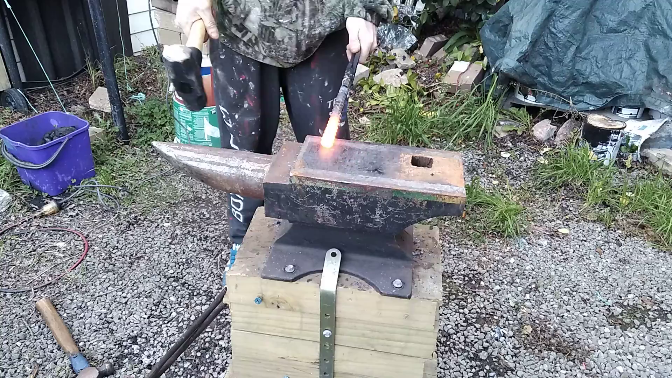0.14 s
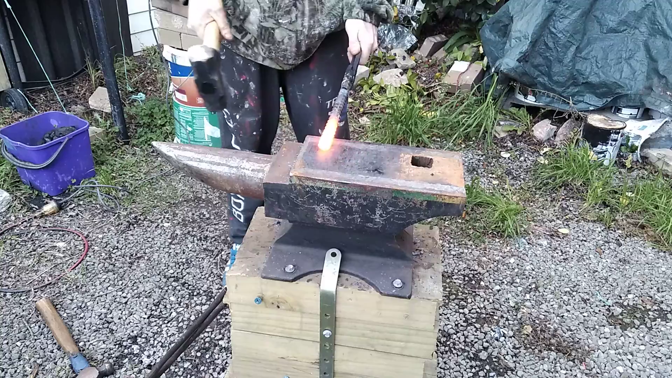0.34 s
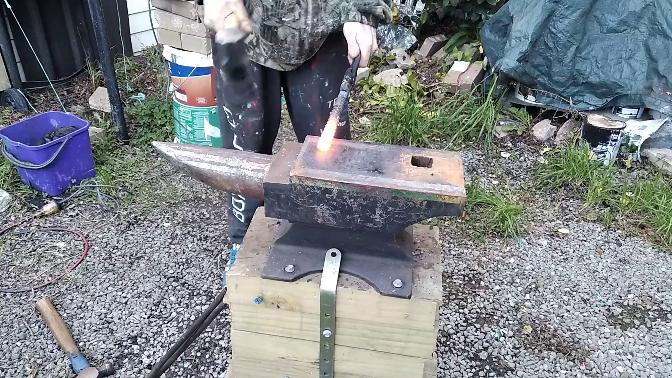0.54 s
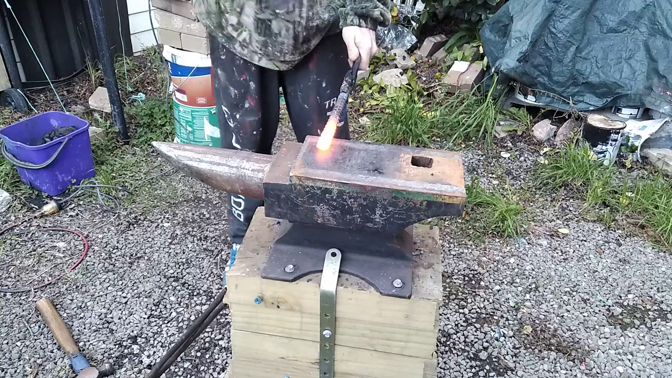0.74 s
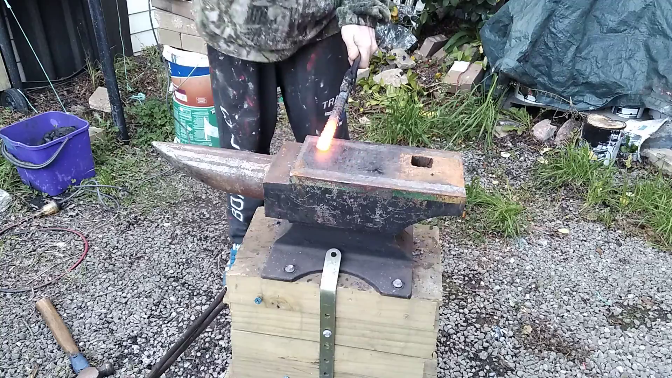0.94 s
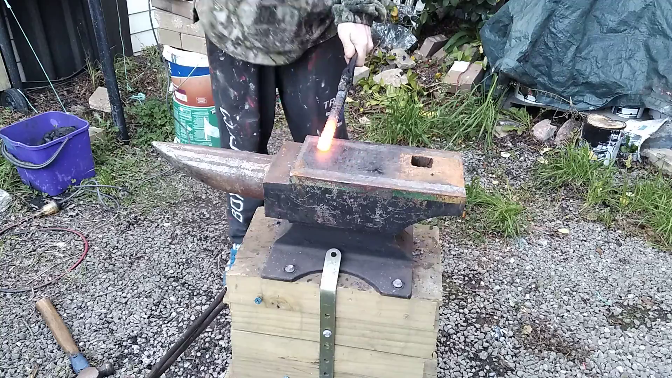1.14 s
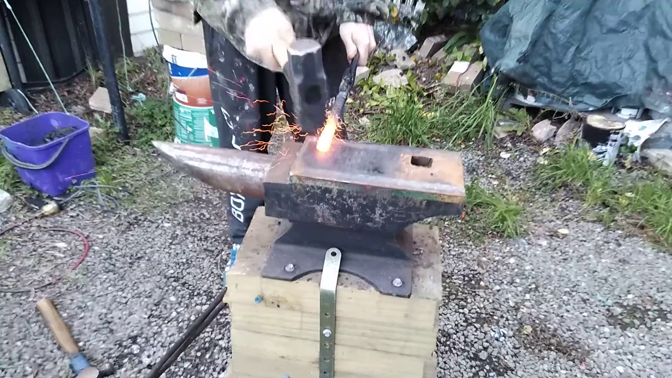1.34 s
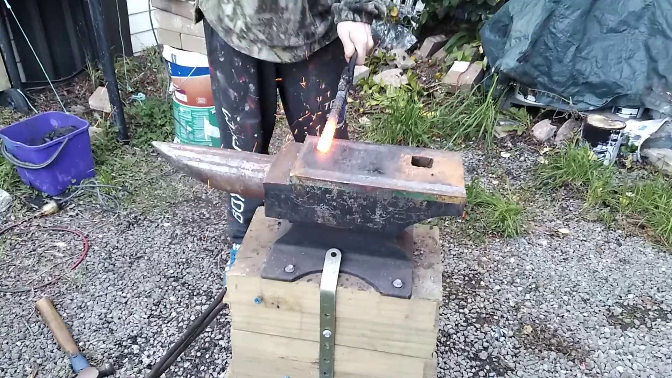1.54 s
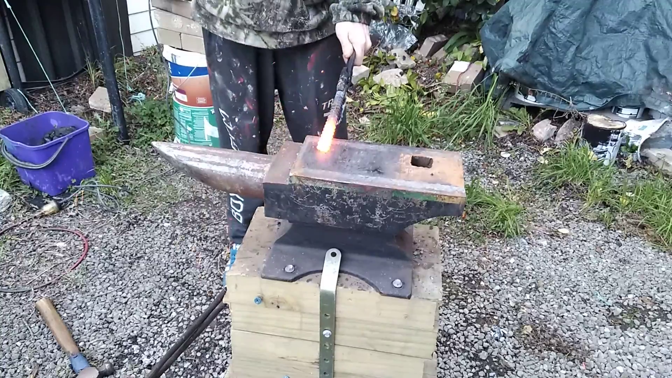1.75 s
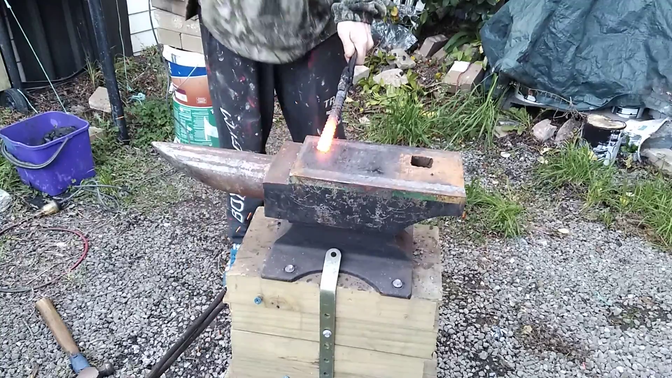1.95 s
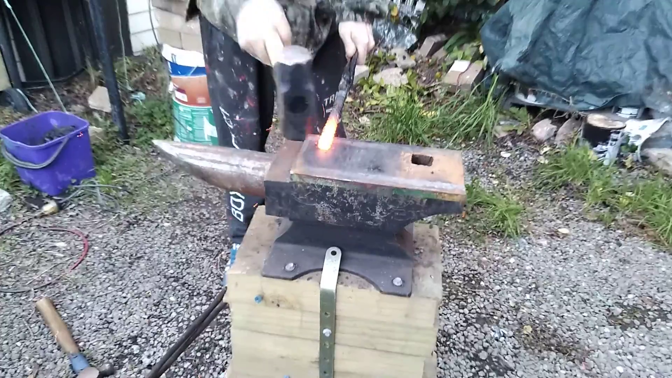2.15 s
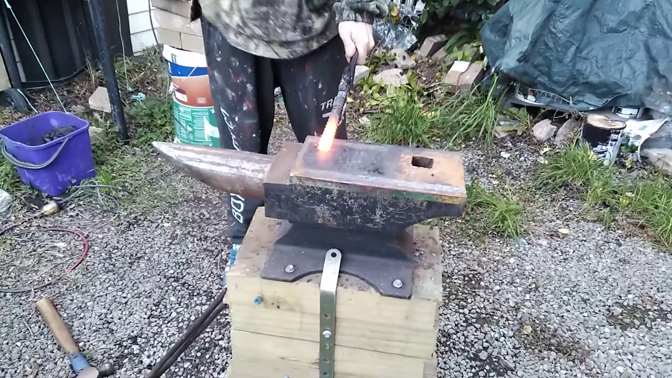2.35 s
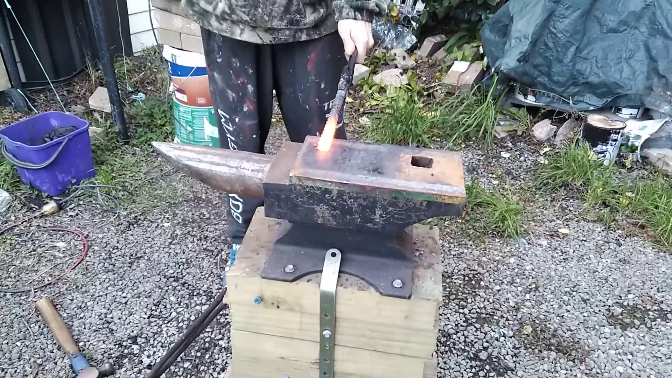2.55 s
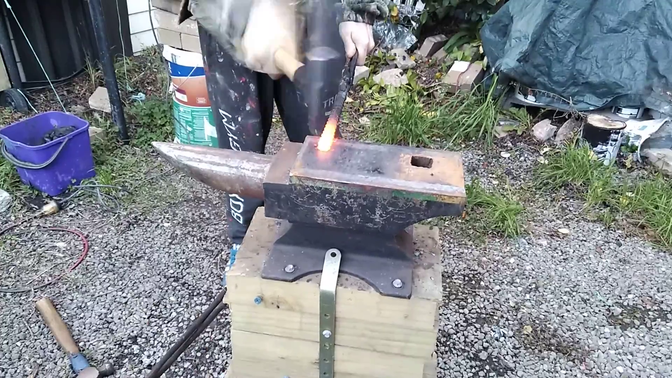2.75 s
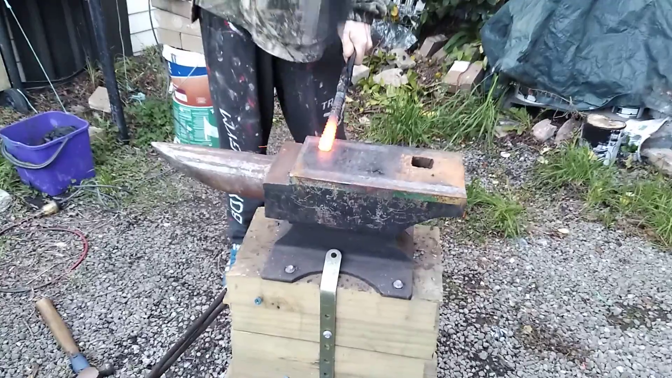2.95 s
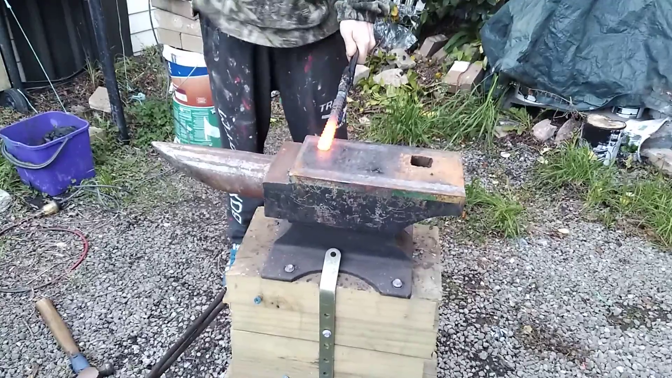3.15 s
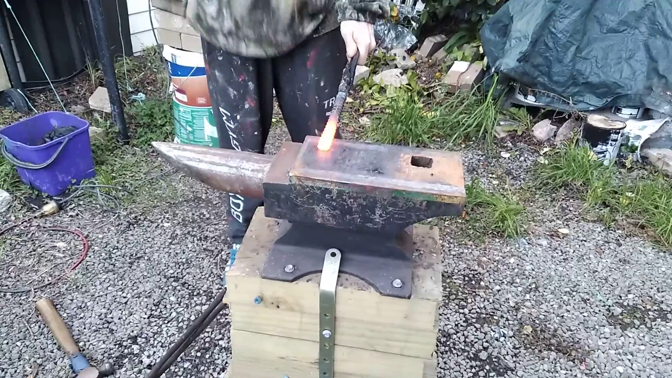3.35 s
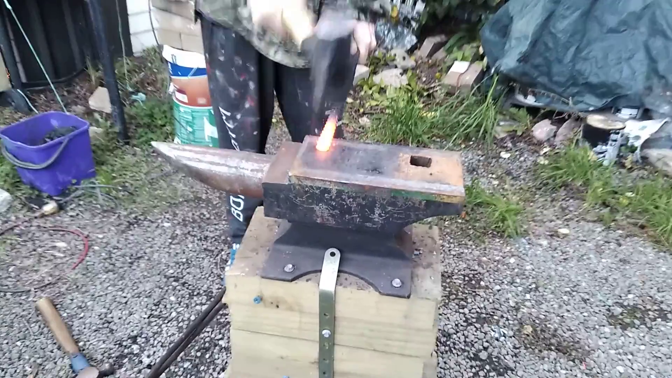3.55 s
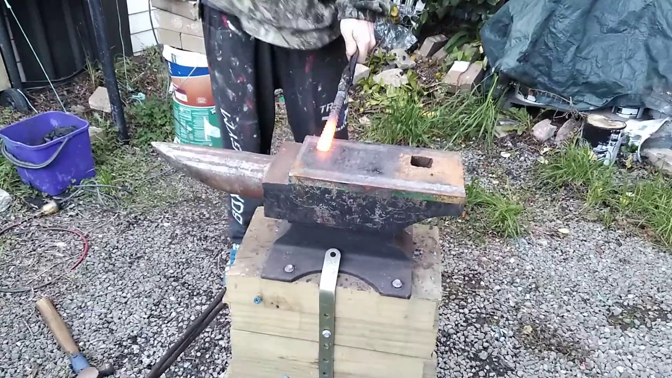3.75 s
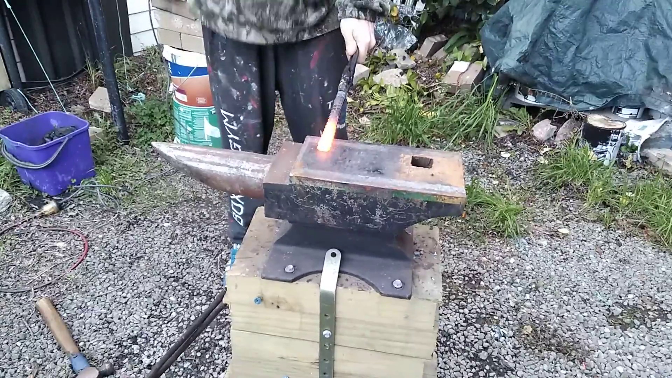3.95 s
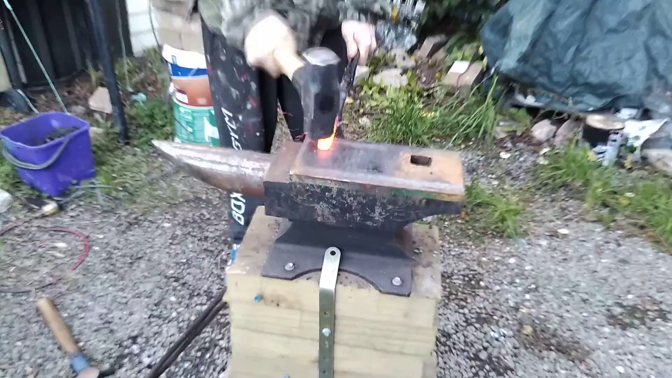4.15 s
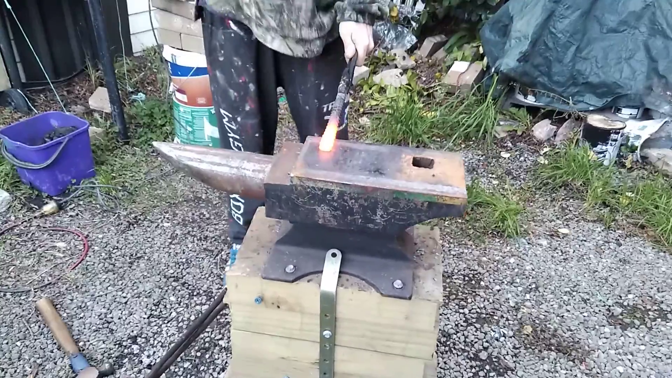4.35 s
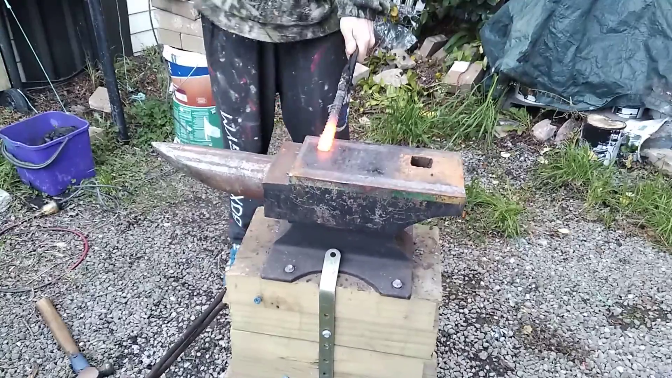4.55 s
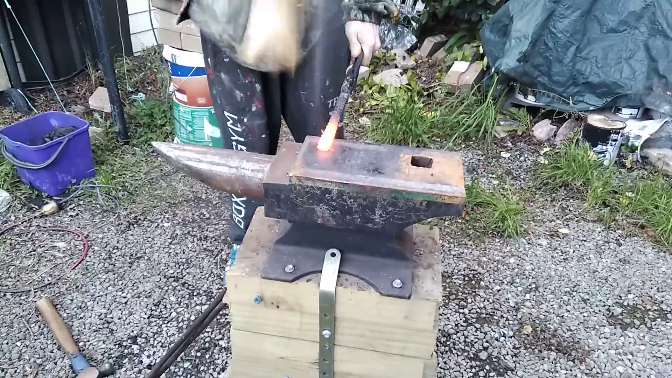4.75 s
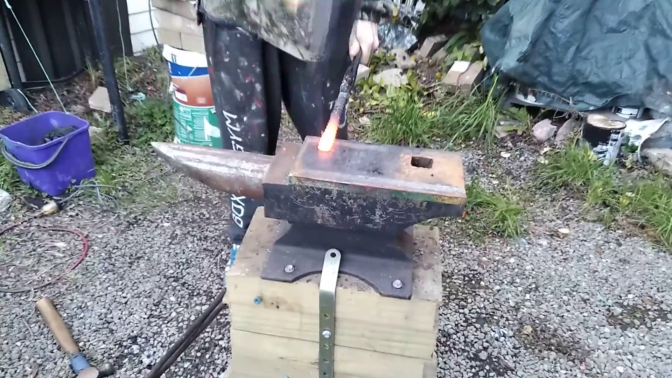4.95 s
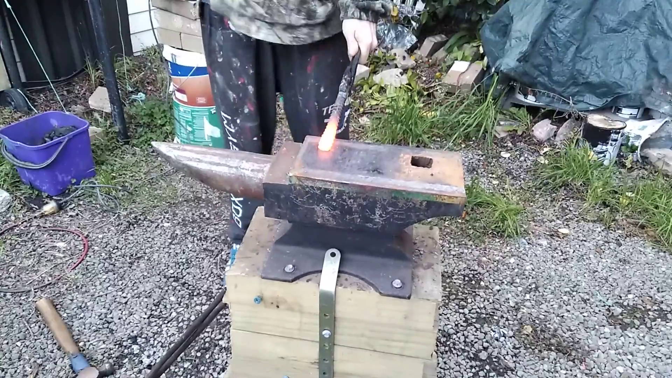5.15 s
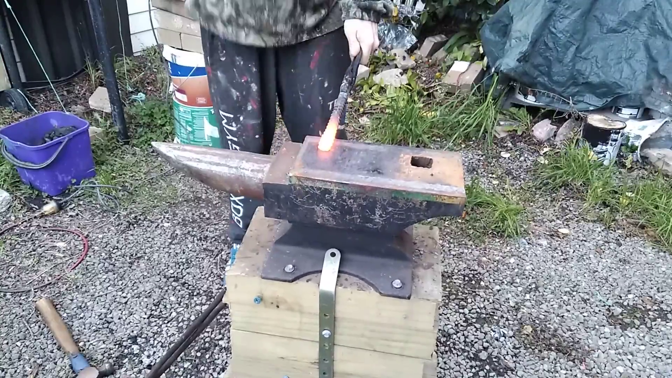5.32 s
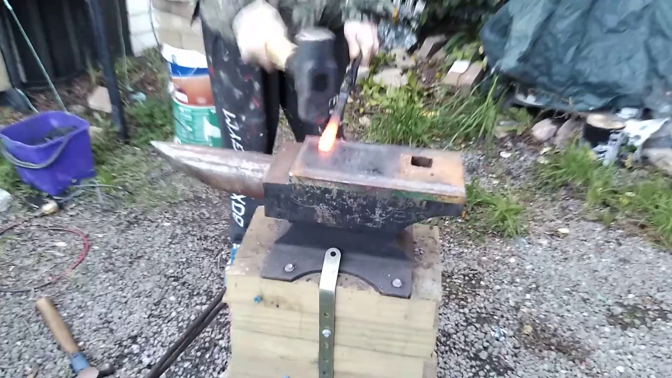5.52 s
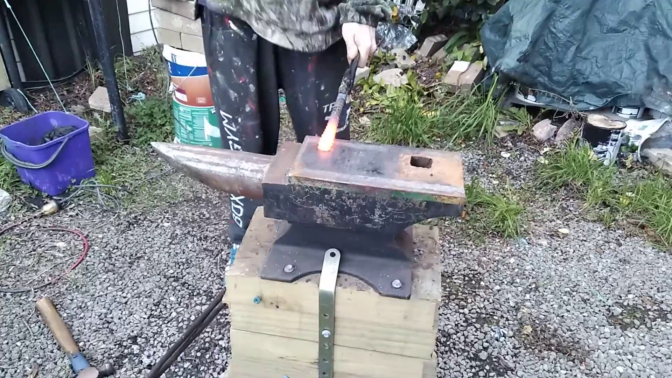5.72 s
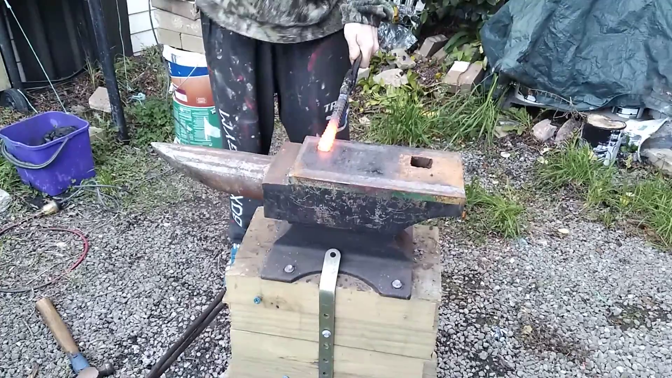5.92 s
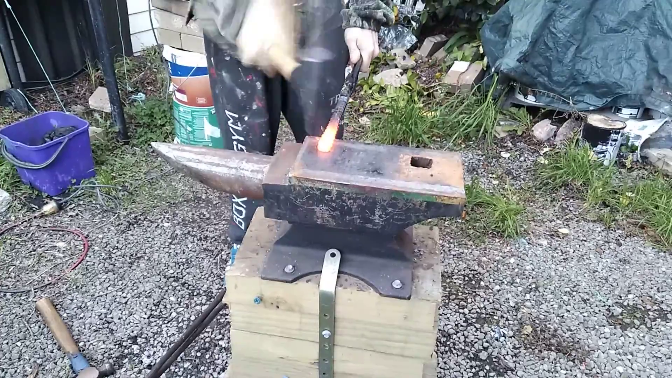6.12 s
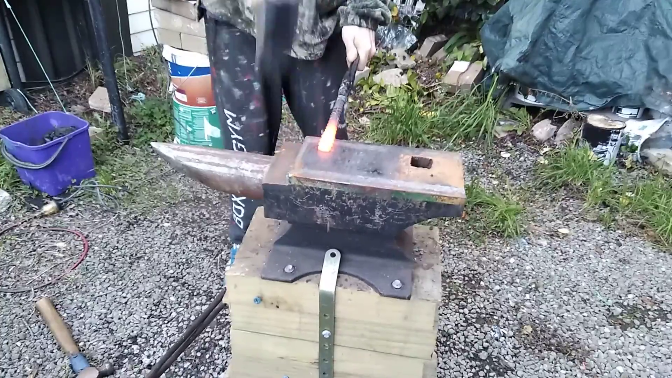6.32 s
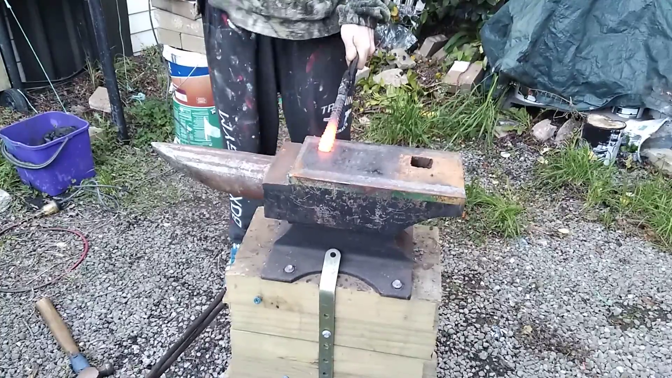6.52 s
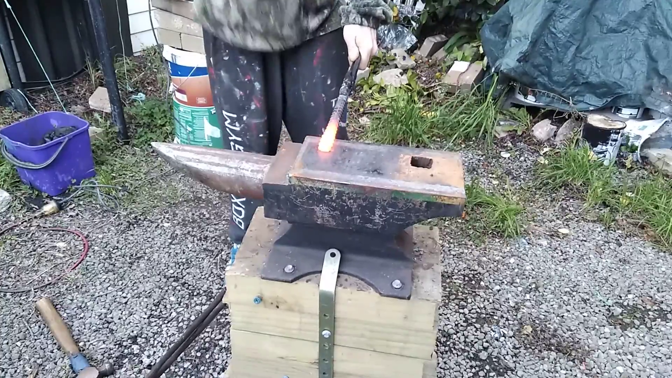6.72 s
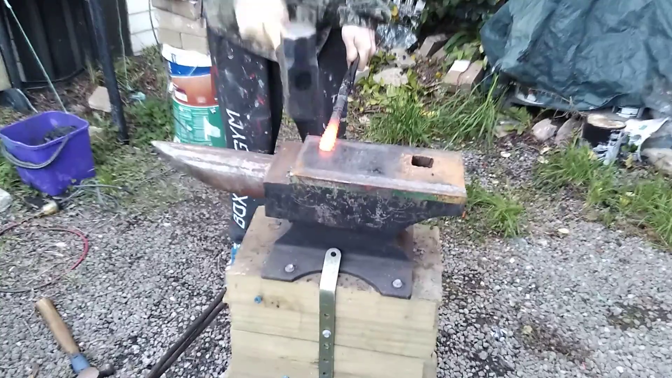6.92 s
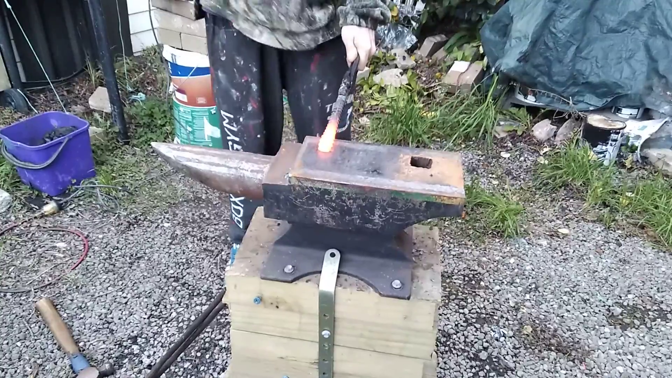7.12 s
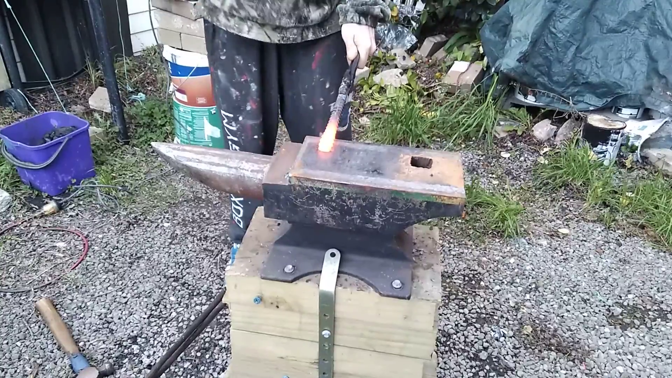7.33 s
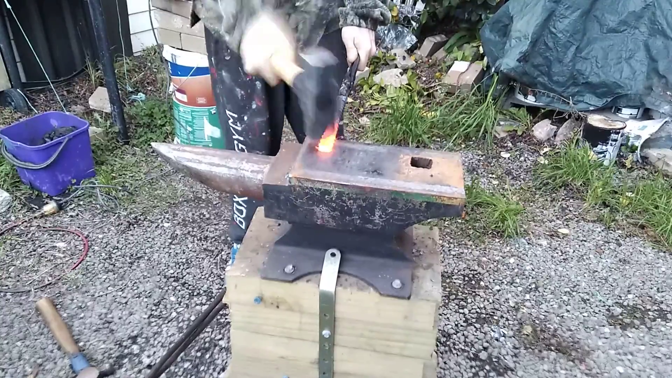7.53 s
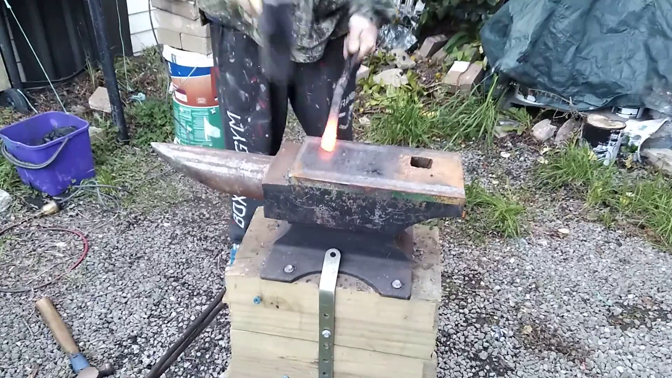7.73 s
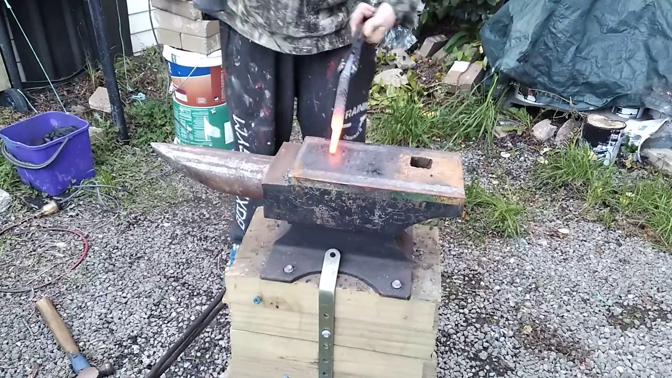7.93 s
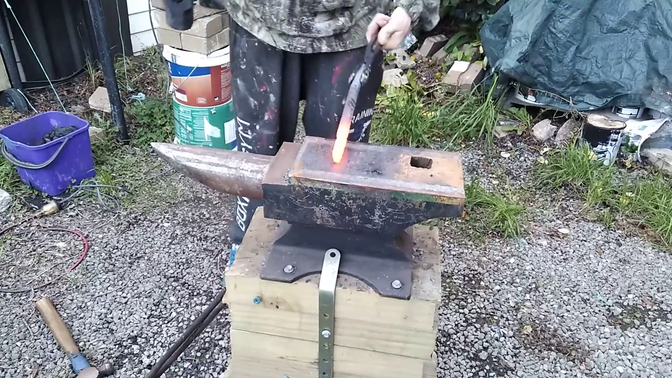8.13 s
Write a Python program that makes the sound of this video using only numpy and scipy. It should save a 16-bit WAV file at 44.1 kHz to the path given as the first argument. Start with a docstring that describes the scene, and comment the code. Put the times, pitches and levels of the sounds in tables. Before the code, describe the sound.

A gas forge roars steadily and fairly quietly in a yard throughout, with a thin, wavering burner whistle that grows slightly stronger. The fire gives one faint tick at about 0.4 seconds. At 1.3 seconds a hand hammer strikes a hot steel bar on an anvil, far louder than the forge. Further blows follow evenly at about 2.1, 2.8, 3.4, 4.1, 4.8, 5.5, 6.1, 6.8 and 7.5 seconds. Each is a sharp crack with a brief metallic ring and a short echo off nearby fences, varying a little in brightness. The first is a bit lighter than the rest. The bar hops on the anvil with faint knocks near 2.9 and 4.3 seconds and a clearer double knock at 4.9 seconds. The blows overload the stereo microphone, so their peaks sound harsh. The forge carries on until the end, around 8 seconds.

```python
"""Ten sharp hammer blows clank over the steady roar of a gas forge in a yard.
A hand hammer upsets a hot steel bar on a strapped-down anvil. Each blow cracks, briefly rings anvil,
tongs and stump, and scatters off fence and shed; now and then the bar hops and knocks back.
The burner whistles and the fire spits faintly. The blows overload a small two-microphone
recorder: its bias sags and the peaks are cut flat."""
import sys
import numpy as np
from scipy import signal
from scipy.fft import rfft, irfft
from scipy.io import wavfile
from scipy.ndimage import uniform_filter1d

SR = 44100
rng = np.random.default_rng(int(sys.argv[2]) if len(sys.argv) > 2 else 0)


def unload_audio(sound):
    """Save the sound as a 16-bit wav file, at the path given as the first command line argument."""
    columns = np.transpose(np.atleast_2d(sound))
    # keep every value between -1 and 1, then stretch to whole-number steps
    steps = np.round(np.clip(columns, -1, 1) * 32767)
    wavfile.write(sys.argv[1], SR, steps.astype(np.int16))


N = 360738

# Hammer blows. Each row: start in seconds, strength in dB, contact in ms, spot on the face
# (edge -1 to middle +1), left bias sag per unit of overload.
BLOWS = [(1.291, 3.5, 0.29, -0.66, 0.67), (2.061, 8, 0.36, -0.13, 0.84), (2.756, 7.5, 0.5, 0.22, 0.55),
         (3.433, 6.5, 0.19, 0.44, 1.2), (4.1, 6, 0.27, -0.16, 0.8), (4.771, 7, 0.23, 0.84, 0.063),
         (5.45, 7.5, 0.25, 0.11, 1.8), (6.131, 6, 0.19, 0.86, 0.05), (6.837, 6.5, 0.12, 1, 0.83),
         (7.521, 9.5, 0.57, -0.83, 0.81)]
# Spectrum of steel striking steel. Each row: frequency in Hz, gain in dB.
CRACK_EQ = [(40, -6.5), (150, -4.5), (400, -1), (1000, -1), (2000, 3.5), (3500, 0.5), (5500, -3.5),
            (8000, -8), (11000, -21), (16000, -37)]


def hammer():
    """The hammer strikes the bar, each time with its own force, contact and spot."""
    out = np.zeros((2, N))
    for start_s, db, contact_ms, spot, _ in BLOWS:
        add(out, blow(contact_ms, spot) * undb(db), start_s)
    return out


def blow(contact_ms, spot):
    """Ring and crack, direct and scattered; longer contact drives the stump harder and damps sooner."""
    usual_contact_ms, crack_ms = 0.34, 11.4
    crack_db, scatter_db, echo_db = 1.5, 29, -7
    t = np.arange(2 * SR // 5) / SR
    longer_ms = contact_ms - usual_contact_ms
    t60_scale = 0.87 - 0.43 * longer_ms
    ring = anvil_ring(t, spot, t60_scale, stump_db=10.5 * longer_ms)
    scatter = yard_scatter(t, t60_scale)
    # echoes smear each mode into a rough cluster
    ring = ring + undb(echo_db) * signal.fftconvolve(scatter, ring, axes=1)[:, :len(t)]
    crack = undb(crack_db) * rng.standard_normal((2, len(t))) * np.exp(-1000 * t / crack_ms)
    impact = crack + undb(scatter_db) * scatter
    impact = np.array([colour(x, *np.transpose(CRACK_EQ)) for x in impact])
    # soft hot steel lengthens the push and dulls the treble
    push_ms = np.clip(contact_ms / (2 * np.pi), .002, 1)
    pole = np.exp(-1000 / SR / push_ms)
    return signal.lfilter([1 - pole], [1, -pole], ring + impact)


def anvil_ring(t, spot, t60_scale, stump_db):
    """Decaying modes of anvil, tongs and stump, weighted by the spot struck."""
    # Pitch of each mode in Hz.
    mode_hz = [171, 361, 420, 640, 875, 1174, 1410, 1631, 2110, 2223, 2320, 2425, 3385, 3415, 3682, 4190,
               4240, 4565, 4920, 4988, 5146, 5626, 5733, 6385, 8520, 10700, 11040]
    # Same modes. Each row: base level in dB, base t60 in seconds.
    mode_decay = [(-20, 0.19), (-24.5, 0.18), (-20, 0.11), (-19.5, 0.051), (-7, 0.036), (-39, 0.26),
                  (-17.5, 0.11), (-10.5, 0.045), (-27, 0.37), (-24, 0.29), (-26, 0.29), (-23.5, 0.18),
                  (-16.5, 0.16), (-8.5, 0.094), (-13.5, 0.13), (-16, 0.11), (-12, 0.13), (-14.5, 0.072),
                  (-11.5, 0.18), (-16, 0.18), (-19.5, 0.22), (-17.5, 0.22), (-14.5, 0.19), (-17.5, 0.2),
                  (-30, 0.16), (-36, 0.08), (-34, 0.091)]
    # Family of each mode: 0 is the stump, 1-4 follow the spot, 5 has no family gain.
    mode_family = [0, 0, 0, 0, 0, 5, 0, 0, 5, 5, 5, 5, 1, 1, 5, 5, 5, 5, 2, 2, 3, 4, 4, 5, 4, 5, 5]
    spot_slope_db = np.array([8, -6.5, -10, -4.5])  # families 1-4, per unit towards the middle
    spread_db, chatter_depth, chatter_ms = 1.5, 0.0056, 5.3
    hz = np.array(mode_hz)[:, None]
    db, t60_s = np.transpose(mode_decay)[:, :, None]
    family_db = np.array([stump_db, *(spot * spot_slope_db), 0])
    level_draw, phase_draw = rng.standard_normal((2, len(hz), 1))
    gain = undb(db + family_db[mode_family, None] + spread_db * level_draw)
    envelope = gain * 1000 ** (-t / (t60_s * t60_scale))
    # the bar chatters on the face and roughens every pitch
    hold = int(chatter_ms * SR / 1000)
    chatter = np.sqrt(hold) * uniform_filter1d(rng.standard_normal((len(hz), len(t))), hold)
    phase = 2 * np.pi * hz * np.cumsum(1 + chatter_depth * chatter, axis=1) / SR
    # high modes radiate unevenly and reach the two microphones in different phases
    leads_rad = (0, phase_draw * hz / 2200)
    return np.array([np.sum(envelope * np.sin(phase + lead), axis=0) for lead in leads_rad])


def yard_scatter(t, t60_scale):
    """Dense echoes of unit energy: near clatter dies fast, a weaker share from far fences lasts."""
    # Echo bands. Each row: centre in Hz, base t60 in seconds.
    echo_bands = [(60, .45), (160, 0.19), (420, 0.21), (1100, 0.25), (2200, 0.27), (4000, 0.24),
                  (7700, 0.22), (14000, 0.39)]
    # Scatter common to both microphones. Each row: frequency in Hz, coherence 0-1.
    echo_coherence = [(60, 0.94), (300, 0.64), (700, 0), (1500, 0)]
    near_stretch, late_stretch, build_up_ms = 0.71, 1.7, 2.8
    late_db, air_loss_db_per_khz = -15, 0.84
    hz = np.fft.rfftfreq(len(t), 1 / SR)
    alike = along(hz, *np.transpose(echo_coherence))
    left, other = rfft(rng.standard_normal((2, len(t))))
    sides = np.array([left, alike * left + np.sqrt(1 - alike ** 2) * other])
    centres_hz = np.array(echo_bands)[:, 0]
    out = 0
    for centre_hz, t60_s in echo_bands:
        band = along(hz, centres_hz, centres_hz == centre_hz)
        fall = 1000 ** (-t / (t60_s * t60_scale))
        near = fall ** (1 / near_stretch)
        late = undb(late_db - air_loss_db_per_khz * centre_hz / 1000) * fall ** (1 / late_stretch)
        out = out + irfft(sides * band, len(t)) * (near + late)
    out = out / np.sqrt(np.mean(np.sum(out ** 2, axis=1)))
    return out * (1 - np.exp(-1000 * t / build_up_ms))


def bar_hops():
    """The bar hops and lands on the face: a two-tone knock, a clink and a tick of noise."""
    # Landings. Each row: start in seconds, level in dB, pitch in Hz, relative clink and tick in dB.
    hops = [(2.916, -30.5, 740, -19, -15), (4.255, -39, 740, -12, -10), (4.898, -12.5, 720, -12, -7),
            (4.931, -25.5, 755, -10, -7)]
    attack_s, t60_s, clink_hz = 0.00038, 0.025, 4100
    under_ratio, under_db = 0.8, -3.5
    out = np.zeros((2, N))
    t = np.arange(SR // 20) / SR
    envelope = (1 - np.exp(-t / attack_s)) * 1000 ** (-t / t60_s)
    for start_s, db, hz, clink_db, tick_db in hops:
        noise = rng.standard_normal((2, len(t)))
        tick = undb(tick_db) * np.array([colour(x, *np.transpose(CRACK_EQ)) for x in noise])
        knock = np.sin(2 * np.pi * hz * t) + undb(under_db) * np.sin(2 * np.pi * under_ratio * hz * t)
        clink = undb(clink_db) * np.sin(2 * np.pi * clink_hz * t)
        add(out, undb(db) * envelope * (knock + clink + tick), start_s)
    return out


def forge_roar(lag_s):
    """The gas flame roars in octave bands that swell together and flicker alone."""
    # Flame spectrum. Each row: frequency in Hz, relative density in dB.
    spectrum = [(20, 9), (50, 2.5), (110, -1), (170, -8), (320, -1), (700, -5.5), (1500, -1.5), (2400, -7),
                (3300, -9.5), (5000, -16.5), (8000, -25.5), (12000, -33), (16000, -41)]
    # Roar common to both microphones. Each row: frequency in Hz, coherence 0-1.
    roar_coherence = [(60, 0.91), (300, 0.86), (700, 0.47), (1500, 0.44), (3000, 0.42), (8000, 0)]
    rms_db, swell_db, flicker_db = -42.5, 0.067, 0.62
    hz = np.fft.rfftfreq(N, 1 / SR)
    alike = along(hz, *np.transpose(roar_coherence))
    right, other = rfft(rng.standard_normal((2, N))) * undb(along(hz, *np.transpose(spectrum)))
    delayed = right * np.exp(-2j * np.pi * hz * lag_s)
    sides = np.array([alike * delayed + np.sqrt(1 - alike ** 2) * other, right])
    centres_hz = 30 * 2 ** np.arange(10)
    out, swell = 0, walk(rate_hz=1.3)
    for centre_hz in centres_hz:
        band = along(hz, centres_hz, centres_hz == centre_hz)
        out = out + irfft(sides * band, N) * undb(swell_db * swell + flicker_db * walk(rate_hz=8.4))
    return unit(out) * undb(rms_db)


def burner_whistle(lag_s):
    """The burner's wavering whistle starts weak and settles to full strength."""
    # Partials. Each row: frequency in Hz, settled level in dB.
    partials = [(1669, -53), (3338, -55.5), (4167, -70)]
    start_db, settle_s, waver_db, drift_depth = -4, 4.4, 1.2, 0.001226
    clock_s = np.cumsum(1 + drift_depth * walk(rate_hz=2)) / SR - np.array([[lag_s], [0]])
    settle_db = start_db * np.exp(-(np.arange(N) / SR / settle_s) ** 2)
    out = np.zeros((2, N))
    for hz, db in partials:
        out += undb(db + settle_db + waver_db * walk(rate_hz=2.67)) * np.sin(2 * np.pi * hz * clock_s)
    return out


def fire_spits(decay_s=0.0014):
    """The fire spits faint ticks of bright noise."""
    # Each row: start in seconds, gain in dB.
    spits = [(0.4324, -43), (5.1044, -57)]
    out = np.zeros((2, N))
    t = np.arange(SR // 50) / SR
    for start_s, db in spits:
        hiss = np.diff(rng.standard_normal((2, len(t) + 1)))
        add(out, undb(db) * hiss * np.exp(-t / decay_s), start_s)
    return out


def undb(db):
    return 10 ** (np.asarray(db) / 20)


def unit(x):
    """Scale to rms 1."""
    return x / np.sqrt(np.mean(x ** 2))


def along(hz, at_hz, values):
    """Interpolate on a log-frequency axis."""
    return np.interp(np.log(np.maximum(hz, 1)), np.log(at_hz), values)


def colour(x, at_hz, db):
    """Minimum-phase filter with the given gains."""
    size = 2048
    gain = undb(along(np.fft.rfftfreq(size, 1 / SR), at_hz, db))
    cepstrum = irfft(np.log(gain))
    cepstrum[1:size // 2] *= 2
    cepstrum[size // 2 + 1:] = 0
    response = irfft(np.exp(rfft(cepstrum)))
    return signal.fftconvolve(x, response)[:len(x)]


def walk(rate_hz):
    """Random steps, smoothed twice; rms 1."""
    hold = int(SR / rate_hz)
    steps = np.repeat(rng.standard_normal(N // hold + 1), hold)
    return unit(uniform_filter1d(uniform_filter1d(steps, hold), hold)[:N])


def add(out, x, start_s):
    """Mix in a two-channel sound."""
    i = int(start_s * SR)
    out[:, i:i + x.shape[1]] += x[:, :N - i]


def scene():
    """Anvil work over the forge, which stands to one side."""
    left_lag_s = 0.00023
    return hammer() + bar_hops() + forge_roar(left_lag_s) + burner_whistle(left_lag_s) + fire_spits()


def record(dry):
    """Port resonances, capsule saturation, bias sag, coupling capacitors, hard clip and top cut."""
    # Microphone port response. Each row: frequency in Hz, left gain in dB, right gain in dB.
    ports = [(100, 0, 0), (3800, 0, 0), (5200, 2, 0), (5900, 4, -1), (6550, 7, -3), (7300, 12, -1),
             (7900, 4, -2), (8600, -1, 0), (10000, -8, 6), (10700, -10, 12), (11400, -11, 6),
             (12100, -10, 1), (13400, -6, -2), (16000, -3, -2)]
    capsule_db, clip_db, coupling_hz, top_hz = 4, -0.4, (1.36, 1.42), 15780
    sag_knee_db, sag_ms, right_sag = (-25.5, -28), 16, 3.34
    hz, *gains_db = np.transpose(ports)
    out = np.array([colour(x, hz, db) for x, db in zip(dry, gains_db)])
    out = undb(capsule_db) * np.tanh(out / undb(capsule_db))
    # loud sound drains each capsule's bias and pulls the zero line down
    pole = np.exp(-1000 / SR / sag_ms)
    loudness = signal.lfilter([1 - pole], [1, -pole], np.abs(out))
    overload = np.maximum(loudness - undb(sag_knee_db)[:, None], 0)
    starts_s, *_, left_sag = np.transpose(BLOWS)
    latest_blow = np.maximum(np.searchsorted(starts_s, np.arange(N) / SR) - 1, 0)
    out = out - np.array([left_sag[latest_blow], np.full(N, right_sag)]) * overload
    # the capacitors turn the sag into a slow swing the other way
    for corner_hz in coupling_hz:
        out = signal.lfilter(*signal.butter(1, corner_hz, "high", fs=SR), out)
    clipped = np.clip(out, -undb(clip_db), undb(clip_db))
    out = signal.sosfilt(signal.ellip(8, .1, 50, top_hz, fs=SR, output="sos"), clipped)
    return np.clip(out, -1, 1)


dry = scene()
out = record(dry)
unload_audio(out)
```